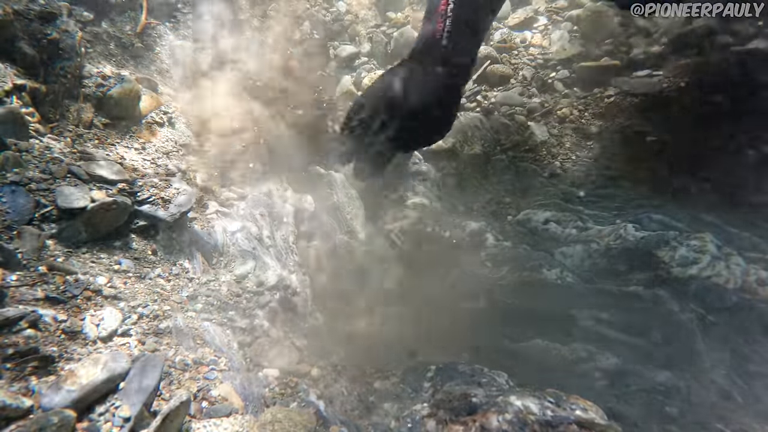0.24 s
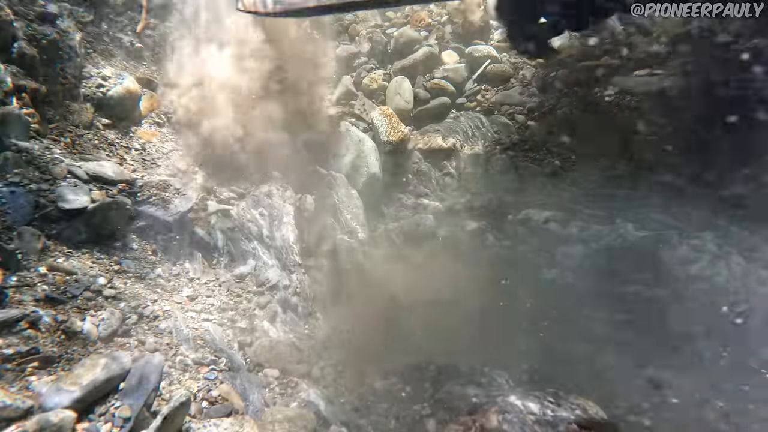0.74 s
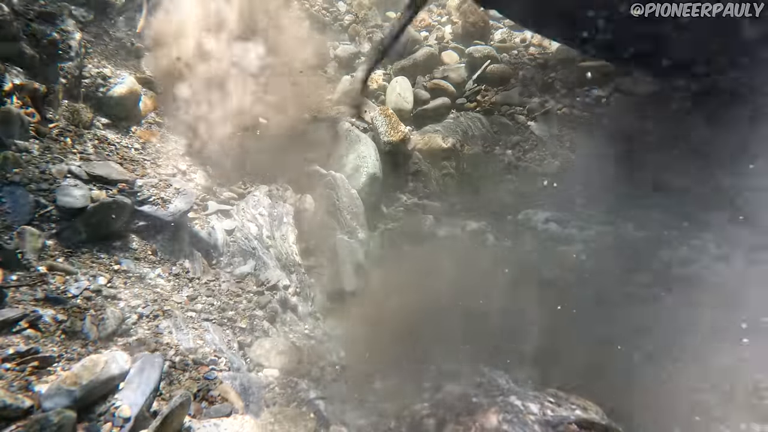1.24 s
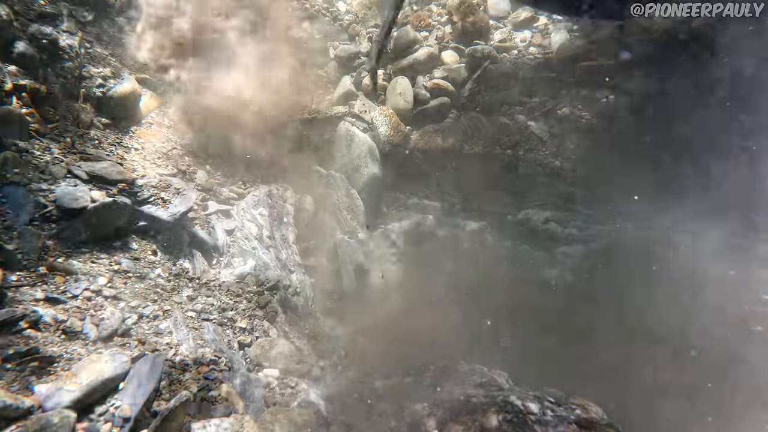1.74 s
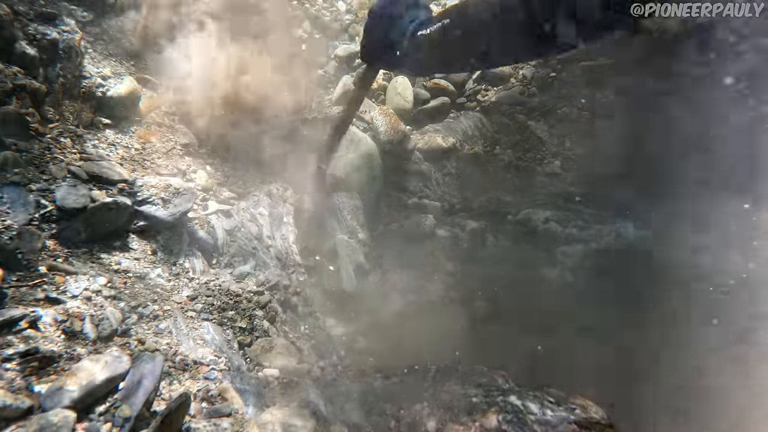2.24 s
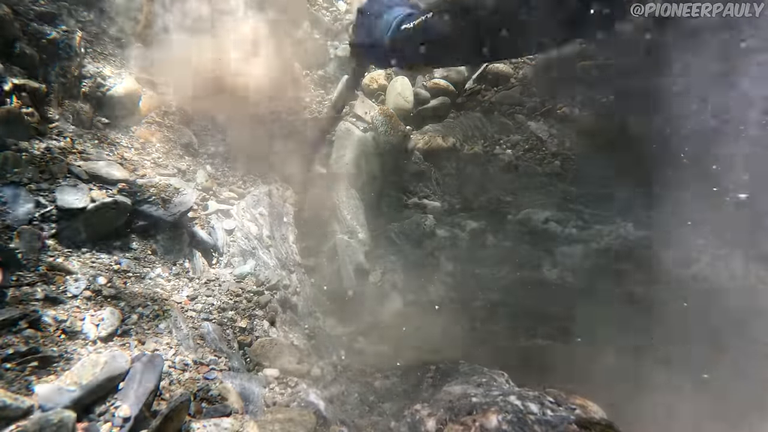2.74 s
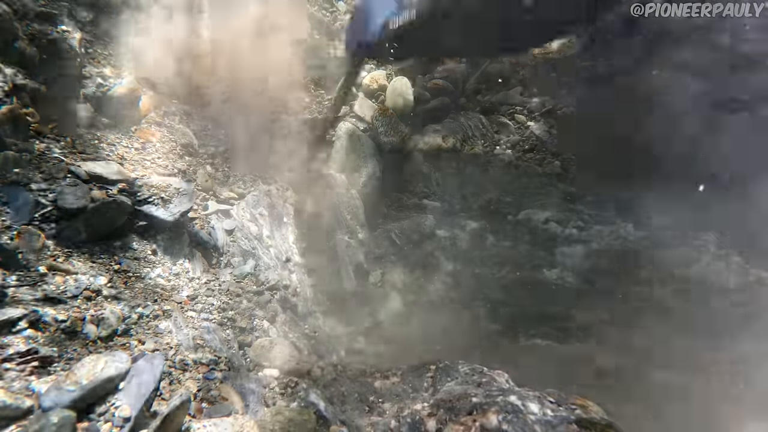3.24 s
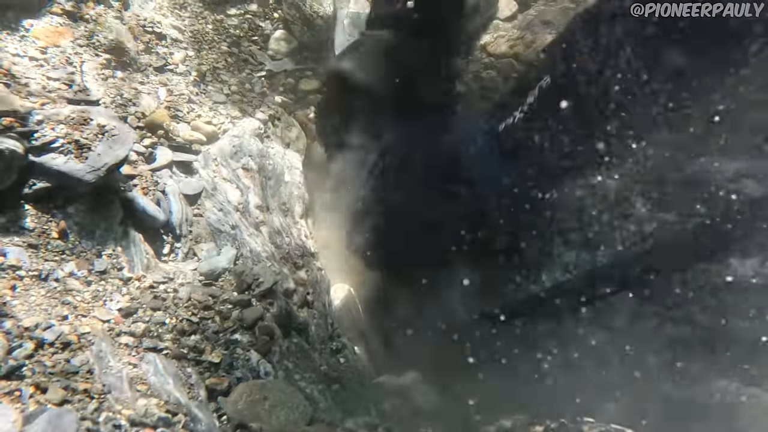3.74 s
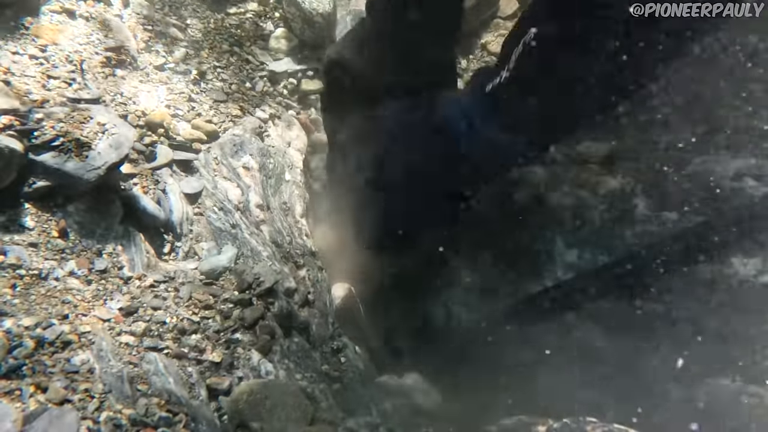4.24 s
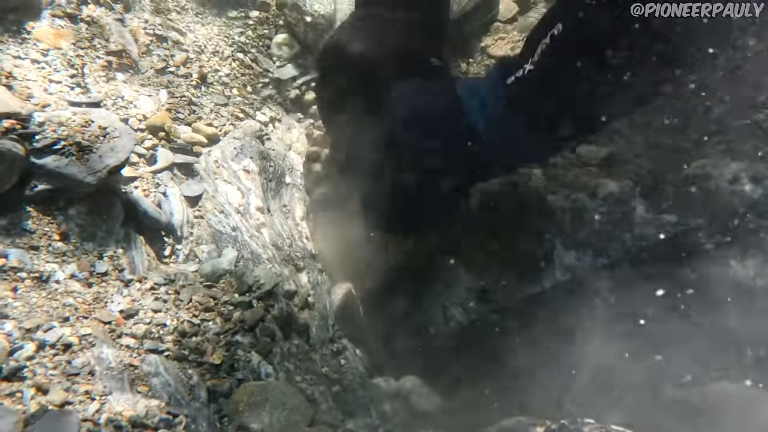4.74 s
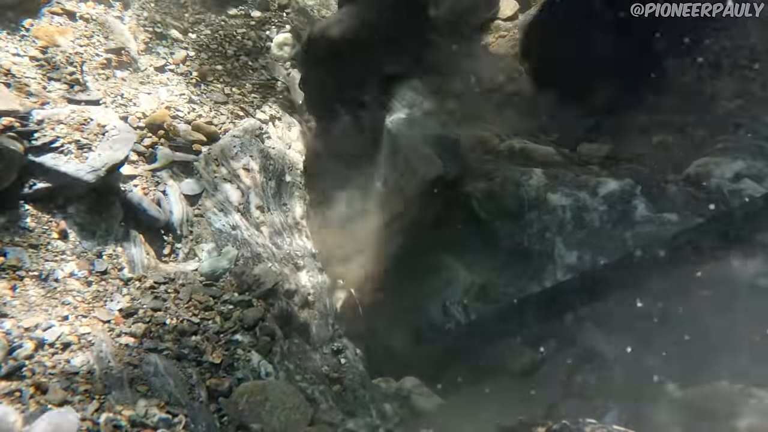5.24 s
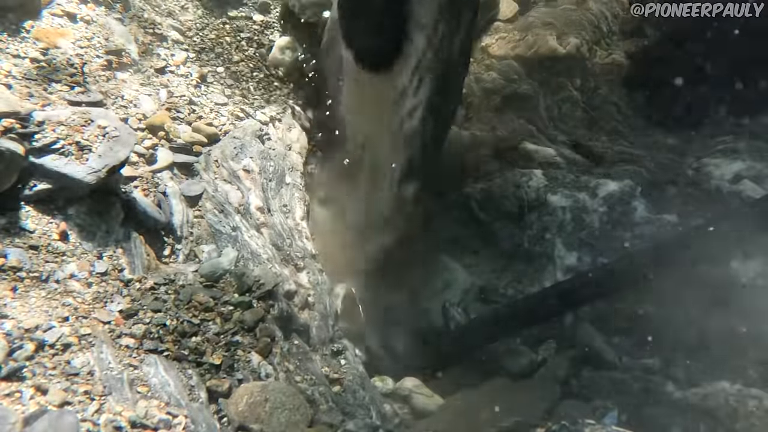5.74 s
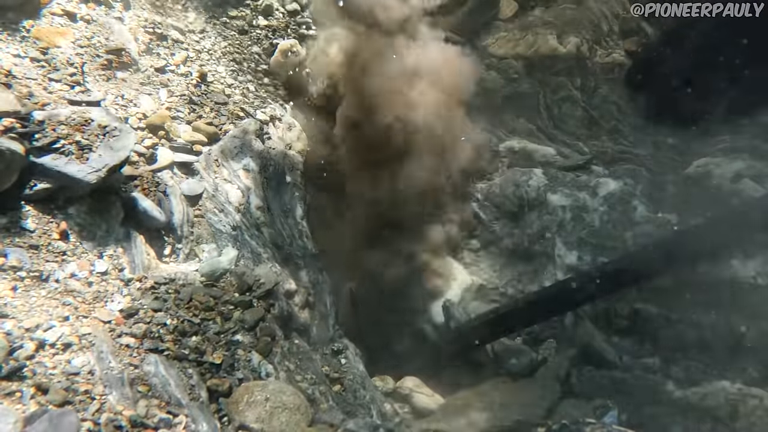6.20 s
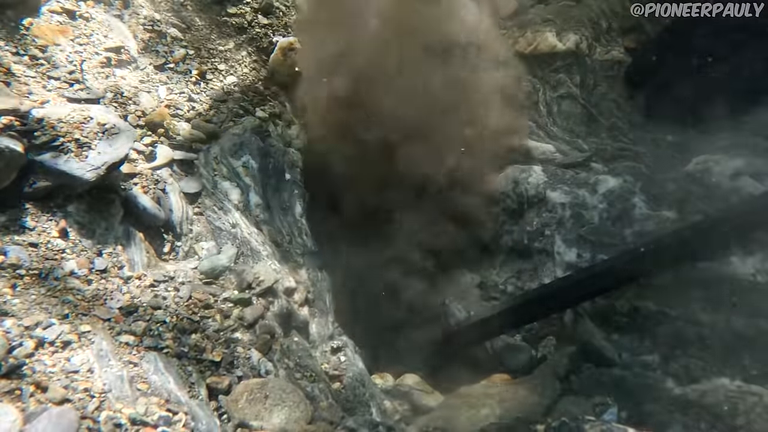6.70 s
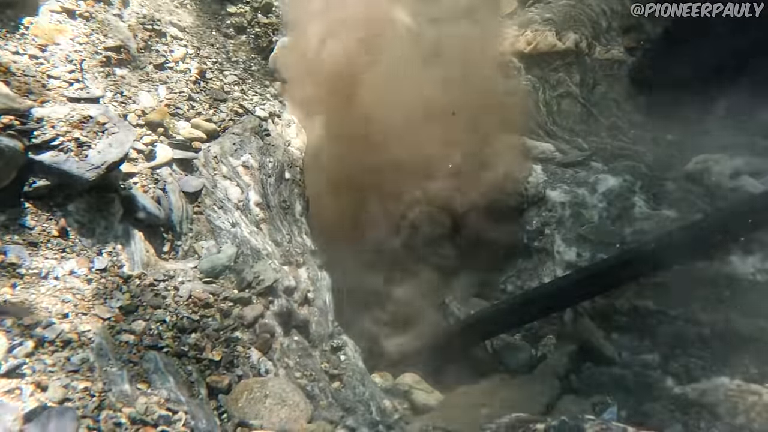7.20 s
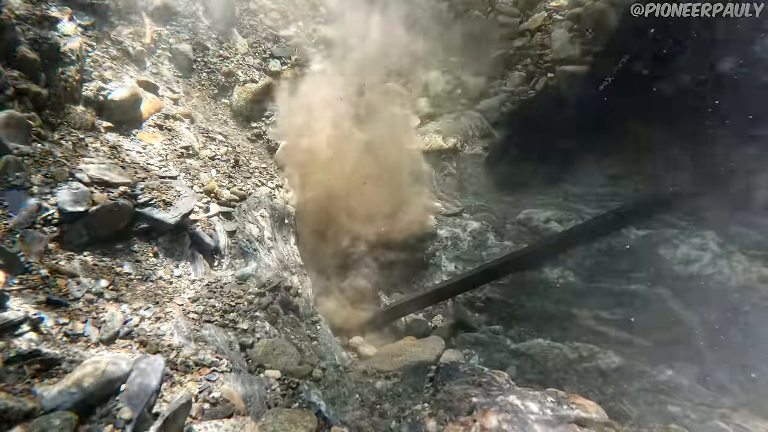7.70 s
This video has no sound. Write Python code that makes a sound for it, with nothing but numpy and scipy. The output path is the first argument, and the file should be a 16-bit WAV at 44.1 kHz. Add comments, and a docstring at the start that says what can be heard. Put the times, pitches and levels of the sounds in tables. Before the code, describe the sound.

Underwater, grit trickles and stones click, then a steel tool scrapes and thumps in a rock crack before water gurgles and gravel settles.

```python
"""A steel tool digs gravel out of a rock crack under a stream, heard inside a waterproof housing.
At first grit trickles, stones click and a few bubbles ring, over a quiet stream.
From about 2 s the tool, made of noise and fading sines, scrapes and rings; hard blows thump, falling in pitch.
At about 6 s water is swept through the crack: noise swells and swarms of short chirping bubbles gurgle.
Then the stirred gravel settles, with random tiny impacts, ticking pebbles and a few last knocks."""
import sys
import numpy as np
from scipy import signal
from scipy.fft import rfft, irfft
from scipy.io import wavfile
from scipy.ndimage import uniform_filter1d, map_coordinates

SR = 44100
rng = np.random.default_rng(int(sys.argv[2]) if len(sys.argv) > 2 else 0)


def store_wav(level_fs):
    """Save 16-bit WAV to argv[1]."""
    pcm = np.round(np.clip(np.atleast_2d(level_fs), -1, 1) * 32767)
    wavfile.write(sys.argv[1], SR, pcm.T.astype(np.int16))


N = 351036
TIME = np.arange(N) / SR  # seconds
HZ = np.fft.rfftfreq(8192, 1 / SR)  # the frequencies at which every filter is drawn

# Scraping strokes: tool on rock, a late drag of gravel, a short squeak. Each row: start in seconds,
# length in seconds, level at full strength in dB, steel ring in dB and squeal in dB,
# both relative to the scraping noise.
STROKES = [(2.229, 0.01, -32, -17, 2), (2.247, 0.0069, -16, -35, -21), (2.39, 0.034, -25.5, -0.5, -29),
           (2.746, 0.0078, -32.5, -35, 6.5), (2.763, 0.0017, -13, -38, -20), (2.895, 0.0084, -33, -1, -13),
           (2.975, 0.013, -28.5, 3, -12), (3.366, 0.0026, -10, -40, -25), (3.499, 0.0092, -23.5, -8, 2),
           (3.538, 0.028, -29.5, -1.5, -7), (3.581, 0.028, -33, -14, -11), (3.678, 0.017, -29.5, -9, -32),
           (3.758, 0.023, -30, -34, -24), (3.861, 0.013, -33, -21, -2), (3.941, 0.011, -31, -16, -2),
           (3.965, 0.0072, -20.5, -22, -27), (4.076, 0.011, -31, -26, -17), (4.143, 0.025, -22, -33, -35),
           (4.26, 0.015, -22, -10, -6.5), (4.338, 0.028, -24.5, -14, -23), (4.461, 0.018, -17, -9.5, -4.5),
           (4.549, 0.039, -16.5, -28, -26), (4.681, 0.016, -19, -8, 3), (4.767, 0.045, -15.5, -29, -17),
           (4.883, 0.013, -20.5, -28, -17), (4.898, 0.0084, -13.5, -14, -19),
           (4.975, 0.034, -13, -19, -2.5), (5.022, 0.028, -17.5, -7, 1.5), (5.055, 0.047, -24, -19, -27),
           (5.208, 0.018, -20.5, -13.5, -23), (5.24, 0.019, -16.5, -10.5, -1.5),
           (5.685, 0.14, -18.5, -31, -16), (6.367, 0.043, -33, -13, -6)]
# How much sand is on the move. Each row: time in seconds, relative level in dB.
SAND = [(0.0, -30.5), (0.68, -35.5), (1.0, -44), (1.48, -46), (2.57, -64.5), (3.3, -69), (3.55, -50.5),
        (4.41, -48), (4.9, -42.5), (5.03, -32), (5.1, -43), (5.85, -41), (5.96, -44), (6.45, -39.5),
        (6.87, -54), (7.71, -53), (7.87, -37.5), (7.96, -43.5)]


def amp(db):
    """Turn decibels into a gain."""
    return 10 ** (np.asarray(db) / 20)


def unit(x):
    """Scale a sound to an rms of 1."""
    return x / np.sqrt(np.mean(x ** 2) + 1e-20)


def along(points):
    """Gain at each frequency, from (Hz, dB) points joined on a log axis."""
    f, db = np.transpose(points)
    return amp(np.interp(np.log(HZ + 1), np.log(f + 1), db))


def curves(rows):
    """One value per sample for each column after the time."""
    s, *cols = np.transpose(rows)
    return [np.interp(TIME, s, c) for c in cols]


def wobble(rate):
    """A smooth random curve, with this many random points a second."""
    points = rng.standard_normal(int(N * rate / SR) + 4)
    return map_coordinates(points, [TIME * rate])


def add(track, s, sound):
    """Mix a sound into the track, starting at s seconds."""
    part = track[max(0, round(s * SR)):][:len(sound)]
    part += sound[:len(part)]


def through(x, response):
    """Filter a sound by convolution, keeping its length."""
    return signal.oaconvolve(x, response)[:len(x)]


def causal(gain):
    """Turn a gain curve into a filter that reacts as early as it can (minimum phase), with energy 1."""
    cepstrum = irfft(np.log(gain + 1e-6))
    half = len(cepstrum) // 2
    cepstrum[1:half] *= 2
    cepstrum[half + 1:] = 0
    response = irfft(np.exp(rfft(cepstrum)))[:half]
    return response / np.linalg.norm(response)


def peak(hz, width):
    """Gain of a resonance: 1 at its pitch, about 4.5 dB lower half a width away."""
    return 1 / (1 + ((HZ - hz) / (0.61 * width)) ** 2)


def swells(rows, rise, fall, linger):
    """Joint gain of movements that build, hold and die away, long ones more slowly; times are for 20 dB."""
    gains = []
    for s, length, db in rows:
        before = np.maximum(s - TIME, 0) / rise
        after = np.maximum(TIME - s - length, 0) / (fall + linger * length)
        gains.append(amp(db - 20 * (before + after)))
    return np.linalg.norm(gains, axis=0)


def contacts(size, rate, spread_db):
    """Random tiny impacts of uneven strength, rate of them a second; rms 1."""
    chance, strength = rng.random(size), rng.standard_normal(size)
    hits = (chance < rate / SR) * rng.choice([-1, 1], size)
    return unit(hits * amp(spread_db * np.minimum(strength, 2.3)))


def housing():
    """What the housing lets through at each frequency: the joint gain of its resonances."""
    # Each row: pitch in Hz, width in Hz, relative level in dB.
    resonances = [(334, 690, -0.5), (388, 100, -1.5), (579.5, 101, 10), (914, 297, 4.5), (1413, 146, -2),
                  (1657, 148, 2.5), (2200, 218, -3), (2515, 360, -3), (3370, 326, -4), (3776, 400, -5),
                  (4170, 215, -9.5), (5070, 600, -7), (5870, 1600, -9.5), (7330, 160, -14.5),
                  (7540, 810, -9), (8686, 630, -12), (9710, 790, -23.5), (11830, 1150, -29.5),
                  (14500, 2500, -50.5)]
    return np.sqrt(sum((amp(db) * peak(hz, width)) ** 2 for hz, width, db in resonances))


def scrapes(shell, rise=0.016, easing=0.7, fall=0.036, squeal_width_hz=70, judder_db=3,
            bright_db=2, dulling_db=3.0, detune=0.015, extra_db=-2):
    """Each stroke is a dense run of tiny slips, heard as scraping noise, steel ring and squeal."""
    # Pitch of the squeal in each stretch of time. Each row: from when in seconds, pitch in Hz.
    squeals = [(0, 900), (3.45, 585), (4.2, 1522), (5.6, 4970)]
    # Tone of the scraping. Each row: frequency in Hz, level in dB.
    scrape_tone = [(60, 10.5), (200, 8), (600, 4.5), (1500, 3.5), (2500, 6.5), (4000, -1.5), (8000, -1.5),
                   (15000, -4.5)]
    out, t = np.zeros(N), TIME[:SR // 3] - .07
    for s, length, db, steel_db, squeal_db in STROKES:
        # every squeal is slightly off its pitch
        base_hz = [hz for since, hz in squeals if since <= s][-1]
        squeal_hz = base_hz * (1 + detune * rng.standard_normal())
        squeal_width = squeal_width_hz * np.sqrt(squeal_hz / 1500)
        # a stroke builds, more gently if it is long, holds, then lets go; the times are for 49.4 dB
        building = np.maximum(-t, 0) / (rise + easing * length)
        easing_off = np.maximum(t - length, 0) / fall
        strength = amp(db - 49.4 * (building + easing_off))
        # the level judders: a new random value every 160 samples
        jumps = rng.standard_normal(len(t) // 160 + 4)
        judder = amp(judder_db * map_coordinates(jumps, [np.arange(len(t)) / 160]))
        slips = contacts(len(t), rate=3000, spread_db=4) * strength * judder
        # a ringing stroke is duller (dB per octave)
        tilt_db = bright_db - dulling_db * amp(steel_db)
        tilt = amp(tilt_db * np.log2(np.clip(HZ, 300, 15000) / 2000))
        # every stroke has a random resonance of its own
        extra_hz = 1500 * 2 ** rng.uniform(-1.025, 1)
        resonance = 1 + amp(extra_db) * peak(extra_hz, 0.17 * extra_hz)
        colour = shell * along(scrape_tone) * tilt * resonance
        parts = [(0, causal(colour)),
                 (steel_db, steel()),
                 (squeal_db, causal(peak(squeal_hz, squeal_width)))]
        sound = sum(amp(part_db) * unit(through(slips, response)) for part_db, response in parts)
        add(out, s + t[0], sound * np.sqrt(np.mean(strength ** 2)))
    return out


def steel():
    """The tool's ring: fading sines at new strengths for each touch; energy 1."""
    # Each row: pitch in Hz, average relative level in dB, time to fade by 60 dB in seconds.
    tones = [(830, -0.5, .06), (1613, -10.5, 0.068), (2225, 3, 0.097), (3110, -4.5, 0.042),
             (3950, -30, 0.063), (3990, -7.5, 0.063), (4300, -3, 0.085), (5100, -12, 0.038),
             (6180, -5.5, 0.022), (7630, -9, 0.054), (8560, -19, 0.045)]
    t = TIME[:SR // 5]
    ring = sum(amp(db + rng.normal(0, 4.7) - 60 * t / t60) * np.sin(2 * np.pi * hz * t)
               for hz, db, t60 in tones)
    return ring / np.linalg.norm(ring)


def taps(shell):
    """The loosely held tool hits rock with a sharp crack and rings on."""
    # The free tip strikes rock. Each row: time in seconds, relative level in dB.
    strikes = [(2.444, -9.5), (2.951, -5.5)]
    tone = along([(800, 1.5), (2200, -0.5), (4000, 1.5), (5500, -5.5), (13000, -4.0)])
    out = np.zeros(N)
    for s, db in strikes:
        ring = steel()
        add(out, s, amp(db + 1.5) * crack(shell * tone, t60=0.033, scatter=0.71))
        add(out, s, amp(db - 3.0) * ring / np.abs(ring).max())
    return out


def thumps(rest_hz=79, glide=0.00481, push=0.039, ring_db=-15, t60=0.76, rattle=0.84):
    """A heavy blow arrives treble first, rattling, and sinks into the housing's low sway."""
    # Blows into the bed. Each row: time in seconds, relative level in dB,
    # how far the pitch starts above its resting value in Hz.
    blows = [(0.241, -40, 296), (.882, -30.5, 685), (2.253, -13.5, 624), (2.769, -20, 624),
             (3.377, -11, 806), (3.974, -23, 363), (4.275, -34, 296), (4.484, -24.5, 290),
             (4.592, -12, 390), (4.803, -10, 373), (4.908, -25, 460), (4.992, -11.5, 800), (5.03, -15, 200),
             (5.255, -17.5, 358)]
    out, t = np.zeros(N), TIME[:SR // 2]
    onset = 1 - np.exp(-t / 0.0022)
    shape = (np.exp(-(t / push) ** 2) + amp(ring_db - 60 * t / t60)) * onset
    for s, db, extra_hz in blows:
        phase = 2 * np.pi * np.cumsum(rest_hz + extra_hz * np.exp(-t / glide)) / SR
        # smoothed noise shakes the pitch at first
        shaking = unit(uniform_filter1d(rng.standard_normal(len(t)), size=70))
        jolts = rattle * shaking * np.exp(-t / 0.0092)
        add(out, s, amp(db - 2.5) * shape * np.sin(phase + jolts))
    return out


def sway(rest_hz=82, push_db=-31.0, following=0.94, lag=0.013, t60=0.76, unsteady_db=3.5):
    """Each levering stroke rocks the housing at its low resonance; push_db is for a stroke of -20 dB."""
    # The tool is levered against the bed: from when, until when, in seconds.
    lever_from, lever_until = (3.45, 5.35)
    rocking = [(s + lag, length, push_db + following * (db + 20))
               for s, length, db, *_ in STROKES if lever_from < s < lever_until]
    unsteady = amp(unsteady_db * wobble(18))
    level = unsteady * swells(rocking, rise=0.049, fall=t60 / 3, linger=0)
    return level * np.sin(2 * np.pi * rest_hz * TIME + 3.8 * wobble(7.2))


def gravel(shell, sand_db=1.0, stones_db=-6.0, slide_db=-6, spurts_db=1.5):
    """Sand hisses under a crackle of larger grains; coarse stones roll along with it and rattle in slides."""
    # Coarse gravel slides. Each row: start in seconds, length in seconds, relative level in dB.
    slides = [(0.12, 0.74, -33), (5.28, 0.07, -32), (5.6, 0.22, -34.5), (5.97, 0.43, -23), (7.78, 0.2, -34)]
    # Tones of the sand and of the stones. Each row: frequency in Hz, level in dB.
    fine_tone = [(200, -13), (1000, -13), (2000, 4.5), (4000, 3), (8000, 0.5), (15000, 6)]
    coarse_tone = [(100, -17), (300, -6.5), (600, -4), (1000, -1), (1700, 1.5), (3000, -6), (8000, -56)]
    # the sand runs in small uneven spurts
    moving = amp(curves(SAND)[0] + spurts_db * wobble(28))
    sliding = amp(slide_db) * swells(slides, rise=0.11, fall=0.044, linger=1.31)
    rolling = np.hypot(amp(stones_db) * moving, sliding)
    hiss = contacts(N, rate=3700, spread_db=0.5)
    grains = crackle(rate=230, spread_db=2.5, colour_db=6.0, t60=0.014)
    fine = unit(hiss + amp(1.5) * grains)
    rattle = contacts(N, rate=1200, spread_db=6.5)
    tumbling = crackle(rate=90, spread_db=6.5, colour_db=4.5, t60=0.034)
    coarse = unit(rattle + amp(-2.5) * tumbling)
    return (through(fine * amp(sand_db) * moving, causal(shell * along(fine_tone)))
            + through(coarse * rolling, causal(shell * along(coarse_tone))))


def crackle(rate, spread_db, colour_db, t60):
    """Grains tumble at random, rate a second; each brief noise burst favours its own bands. Rms 1."""
    # Each row: middle of the band in Hz, its width in Hz.
    bands = [(700, 600), (1500, 900), (2600, 1300), (4300, 2000), (7000, 3400), (11500, 5500)]
    hits = np.flatnonzero(rng.random(N) < rate / SR)
    strength_db = spread_db * np.minimum(rng.standard_normal(len(hits)), 2)
    fade = amp(-60 * TIME[:SR // 40] / t60) ** 2  # of the energy
    out = np.zeros(N)
    for hz, width in bands:
        band_db = colour_db * np.minimum(rng.standard_normal(len(hits)), 2)
        energy = np.bincount(hits, amp(strength_db + band_db) ** 2, N)
        bursts = rng.standard_normal(N) * np.sqrt(np.abs(through(energy, fade)))
        out += np.sqrt(width) * through(bursts, causal(peak(hz, width)))
    return unit(out)


def clicks(shell):
    """Single knocks, each with its own pitch and brightness."""
    # Single knocks of stone on stone or steel, loud and faint. Each row: time in seconds,
    # relative level in dB, pitch in Hz, relative treble in dB.
    knocks = [(0.045, -9.5, 2170, -15), (0.174, -11, 3640, -24), (0.188, -7.5, 2100, -24),
              (0.332, -3.5, 2350, -18), (0.398, -8.5, 2640, -10), (0.415, -1, 1340, -25),
              (0.439, -6.5, 1630, -21), (0.471, -9.5, 3700, -16), (0.54, -14.5, 2700, -39),
              (0.625, -11, 2600, -9), (0.686, -4, 1770, -46), (0.755, -12.5, 2240, -23),
              (0.776, -10.5, 2240, -28), (0.826, -16.5, 2210, -16), (0.892, -13.5, 2520, -24),
              (0.988, -22, 1630, -39), (1.076, -26, 1680, -26), (1.167, -23, 856, -20),
              (1.712, -20, 820, -17), (1.834, -25, 834, -9), (2.118, -31.5, 2790, -19),
              (2.246, 0, 2030, -27), (2.764, 1.5, 848, -13.5), (3.302, -31.5, 810, -9),
              (3.365, 0.5, 1520, -13), (3.375, 3, 893, -18), (3.955, -5, 2730, -14),
              (4.053, -15.5, 1570, -15), (4.148, -4, 2470, -6), (4.169, -6.5, 910, -5),
              (4.354, -5.5, 1570, -4.5), (4.558, -7, 1610, -24), (4.576, -1, 2180, -19),
              (4.686, 0.5, 1590, -29), (4.782, -2, 2500, -1), (5.071, -7, 2450, -17),
              (5.085, -9, 2440, -12), (5.275, -4.5, 824, -23), (5.316, -9.5, 2600, -37),
              (5.346, -9.5, 2590, -38), (5.741, -0.5, 993, -33), (5.782, -1.5, 2330, -12.5),
              (5.846, -3.5, 2290, -37), (5.941, -12, 850, -39), (6.027, -13, 770, -13.5),
              (6.104, -15, 1640, -21), (6.121, -4.5, 1030, -24.5), (6.232, -6.5, 830, -38),
              (6.362, -6.5, 2270, -22), (6.416, -3.5, 806, -44), (6.444, -10, 2410, -43),
              (6.468, -5.5, 2370, -33), (6.508, -2, 890, -43), (6.633, -11, 910, -22),
              (6.801, -15.5, 860, -21), (6.825, -20, 1690, -2), (6.857, -21.5, 1710, -13),
              (6.992, -17, 1790, -66), (7.192, -21, 2050, -37), (7.259, -25.5, 2080, 0),
              (7.289, -18, 2500, -15), (7.318, -22.5, 1640, -28), (7.638, -25.5, 2570, -33),
              (7.658, -21, 1480, 1), (7.775, -16.5, 1860, -6.5), (7.841, -14, 2530, -18)]
    out = np.zeros(N)
    for s, db, hz, treble_db in knocks:
        add(out, s, amp(db - 1.5) * knock(shell, hz, treble_db))
    return out


def knock(shell, hz, treble_db, bass_db=-23, bass_per_octave_db=11):
    """One stone knocks at its resonance; a bigger, lower stone has more bass. Peak 1."""
    low_db = bass_db - bass_per_octave_db * np.log2(hz / 1700)
    colour = along([(100, low_db + 6.0), (700, low_db + 7.5), (2200, 0),
                    (6500, treble_db + 14.5), (14000, treble_db + 11.5)])
    stone = 1 + 2.07 * peak(hz, 0.073 * hz)
    return crack(shell * colour * stone, t60=0.02, scatter=0.47)


def crack(colour, t60, scatter):
    """One sharp contact followed by quick scatter off the rock, a fading noise; peak 1."""
    t = TIME[:SR // 10]
    force = scatter * rng.standard_normal(len(t)) * amp(-60 * t / t60)
    force[0] = 1
    sound = through(force, causal(colour))
    return sound / np.abs(sound).max()


def pebbles(shell, count=170, full_db=1, following=0.71, spread_db=3.0, pitch_hz=3600, octaves=0.7,
            smaller_db=3, width=0.58):
    """Small pebbles tick at random and stand out as the sand dies down; the higher the pitch, the softer."""
    out, (level_db,) = np.zeros(N), curves(SAND)
    for when, size, pitch in rng.random((count, 3)):
        at, octave = int(when * N), octaves * (4 * pitch - 2)
        hz = pitch_hz * 2 ** octave
        tick = crack(shell * (peak(hz, width * hz) + amp(-32.5)), t60=0.0093, scatter=0.61)
        size_db = spread_db * (4.65 * size - 2.5)
        tick_db = full_db + following * level_db[at] + size_db - smaller_db * octave
        add(out, at / SR, amp(tick_db) * tick)
    return out


def bubbles():
    """Single bubbles and one low knock ring as fading sines, their pitch rising slightly."""
    # Single bubbles, and a low knock at 1.946 s. Each row: time in seconds, relative level in dB,
    # starting pitch in Hz, time to fade by 60 dB in seconds.
    singles = [(0.849, -17, 324, 0.042), (0.878, -11.5, 322, 0.03), (0.878, -18, 595, 0.024),
               (0.899, -40.5, 151, 0.31), (1.946, -29.5, 517, 0.018), (2.045, -30.5, 2290, 0.026),
               (6.928, -23.5, 317, 0.038), (6.948, -17.5, 293, 0.019), (6.99, -36, 159, 0.2),
               (6.983, -29, 2230, 0.013), (7.057, -25.5, 3400, 0.014), (7.15, -41, 166, 0.24),
               (7.262, -28, 2060, 0.025), (7.735, -29.5, 920, 0.091), (7.754, -32, 3490, 0.031),
               (7.78, -27.5, 1760, 0.036), (7.845, -30, 2340, 0.032), (7.866, -22, 3540, 0.025),
               (7.894, -29.5, 3670, 0.04)]
    out = np.zeros(N)
    for s, db, hz, t60 in singles:
        add(out, s, amp(db + 8.5) * bubble(hz, t60, glide=0.23))
    return out


def bubble(hz, t60, glide):
    """A bubble swells quickly and rings; glide is the relative change of pitch over its life."""
    t = TIME[:int(t60 * SR)]
    level = amp(-60 * t / t60) * (1 - np.exp(-t * hz))
    return level * np.sin(2 * np.pi * hz * t * (1 + glide * t / t60 / 2))


def gurgles(cycles=55, longest=0.11, glide=-0.014, glide_spread=0.11, spread_db=4):
    """Stirred gravel lets go swarms of small bubbles that chirp, a little more often down than up."""
    # Bursts of chirping bubbles. Each row: start in seconds, length in seconds, level in dB,
    # middle pitch in Hz, spread of pitch in octaves.
    bursts = [(5.279, 0.11, -30.5, 2610, 0.032), (5.286, 0.19, -37, 1042, 0.11),
              (5.334, 0.16, -42, 3690, 0.24), (5.359, 0.24, -41.5, 1780, 0.365),
              (6.029, 0.33, -27, 101.4, 0.27), (6.033, 0.21, -28, 338, 0.21), (6.024, 0.38, -33, 1202, 0.5),
              (6.363, 0.042, -13.5, 2290, 0.057), (6.445, 0.055, -23, 2350, 0.061),
              (6.92, .17, -49, 536, 0.69), (7.183, 0.15, -39, 2170, 0.4), (7.632, 0.04, -43, 2620, 0.42),
              (7.768, 0.22, -35, 949, 0.053), (7.75, 0.12, -34, 2084, 0.7)]
    out = np.zeros(N)
    for s, length, db, pitch_hz, octaves in bursts:
        swarm = np.zeros(int((length + .3) * SR))
        starts = np.arange(0, length, .003)  # a bubble about every 3 ms
        for start, (shift, pitch, size, bend) in zip(starts, rng.standard_normal((len(starts), 4))):
            hz = pitch_hz * 2 ** (octaves * np.clip(pitch, -2, 2))
            chirp = bubble(hz, min(cycles / hz, longest), glide + glide_spread * bend)
            add(swarm, start + .002 * shift, amp(spread_db * size) * chirp)
        add(out, s, amp(db) * swarm * np.sqrt(length * SR) / np.linalg.norm(swarm))
    return out


def water(calm_db=-61, sweep_db=2.0):
    """The steady stream, and eddies that swell when the arm moves, both made of filtered noise."""
    # The arm sweeps through the water. Each row: start in seconds, length in seconds, relative level in dB.
    arm_sweeps = [(0.0, 0.049, -45), (0.24, 0.012, -36.5), (1.38, 0.058, -49), (3.64, 1.53, -41.5),
                  (6.04, 0.26, -31), (7.08, 0.05, -52.5)]
    # Tones of the eddies and of the stream. Each row: frequency in Hz, level in dB.
    eddy_tone = [(25, -55), (55, -12), (100, 5.5), (160, 0), (230, -8), (340, -6.5), (480, -9), (900, -14),
                 (2500, -110)]
    stream_tone = [(25, -52), (80, -18), (200, 12.5), (450, 9.5), (570, 20.5), (730, 1), (850, 11),
                   (1100, -30), (1600, -1), (5000, -16), (9000, -13), (12000, -50)]

    def noise(gain):
        """Steady noise with this tone, rms 1."""
        return unit(through(rng.standard_normal(N), causal(gain)))

    stream = amp(-58.5 + 1.9 * wobble(8)) * noise(along(stream_tone))
    sweeping = amp(sweep_db) * swells(arm_sweeps, rise=0.082, fall=0.12, linger=0.087)
    flow = np.hypot(amp(calm_db), sweeping)
    return stream + flow * amp(3.2 * wobble(23)) * noise(along(eddy_tone))


def scene():
    """Everything in the water reaches one microphone inside the housing."""
    shell = housing()
    stones = gravel(shell) + pebbles(shell) + clicks(shell)
    tool = scrapes(shell) + taps(shell) + thumps() + sway()
    return (stones + tool + bubbles() + gurgles() + water())[None]


def record(dry):
    """The loudest peaks are rounded off; the deepest bass and the treble above the band limit are cut."""
    ceiling, top_hz = .88, 15800
    rounded = dry / (1 + np.abs(dry / ceiling) ** 6) ** (1 / 6)
    bass_cut = signal.butter(5, 52, "high", fs=SR, output="sos")
    lean = signal.sosfilt(bass_cut, rounded)
    treble_cut = signal.firwin(401, top_hz, window=("kaiser", 11), fs=SR)
    return signal.fftconvolve(lean, treble_cut[None], "same")


dry = scene()
out = record(dry)
store_wav(out)
```